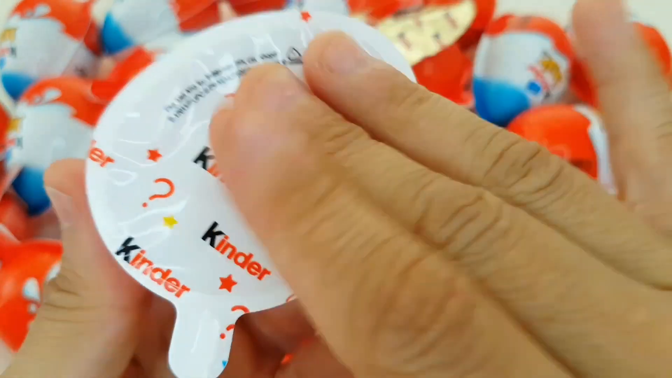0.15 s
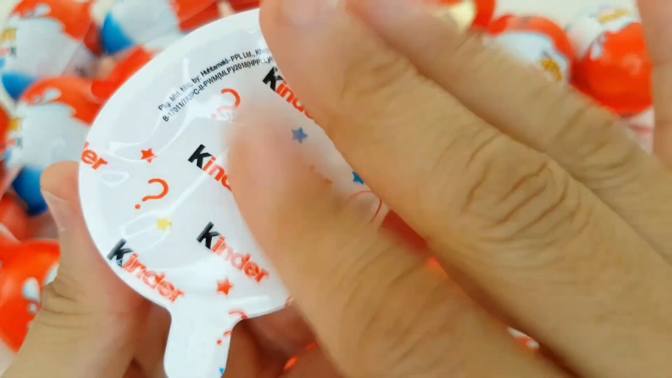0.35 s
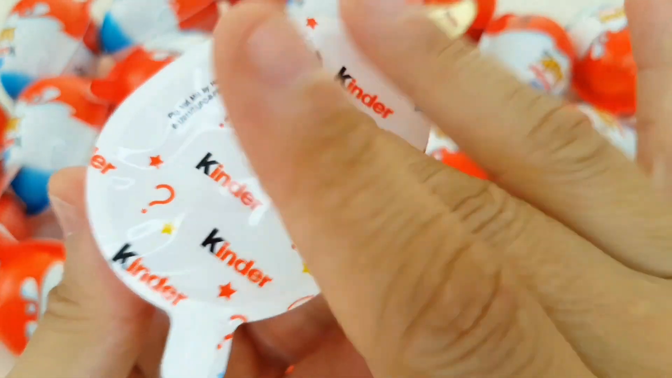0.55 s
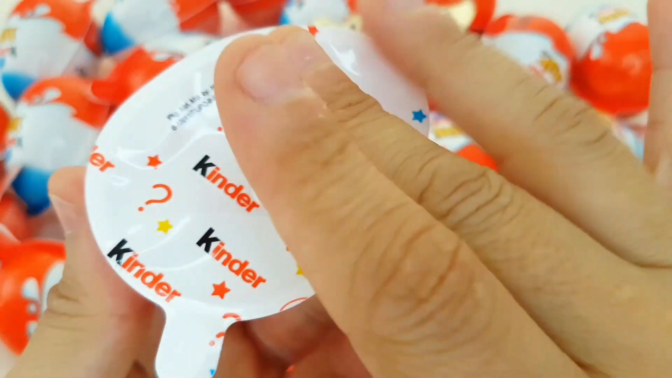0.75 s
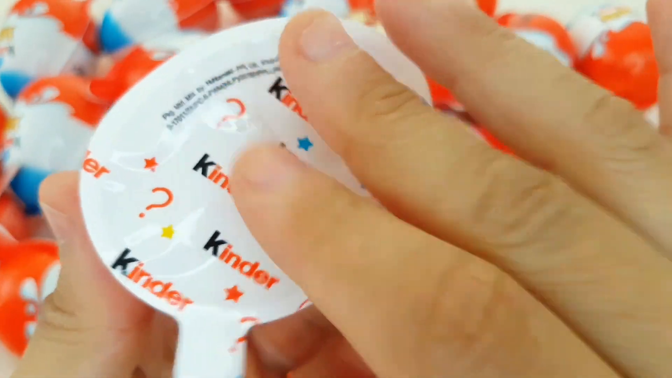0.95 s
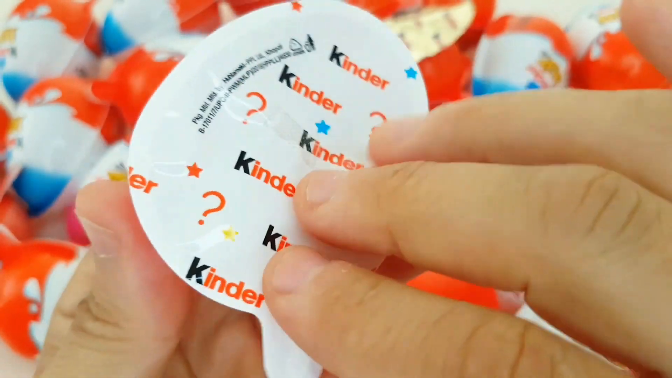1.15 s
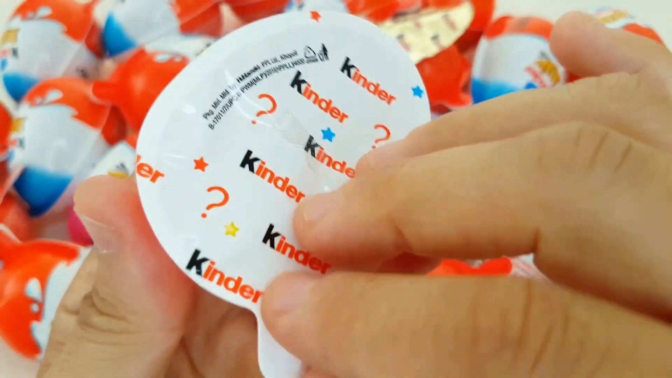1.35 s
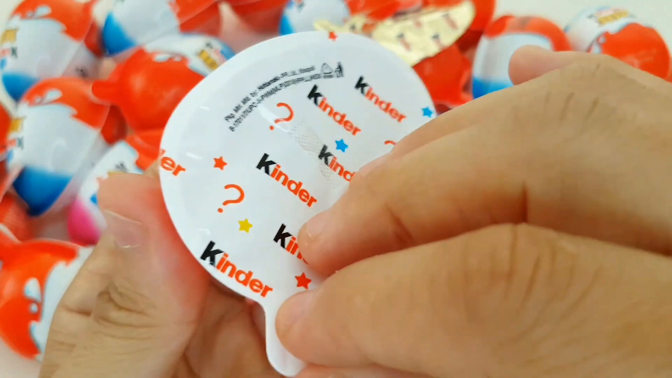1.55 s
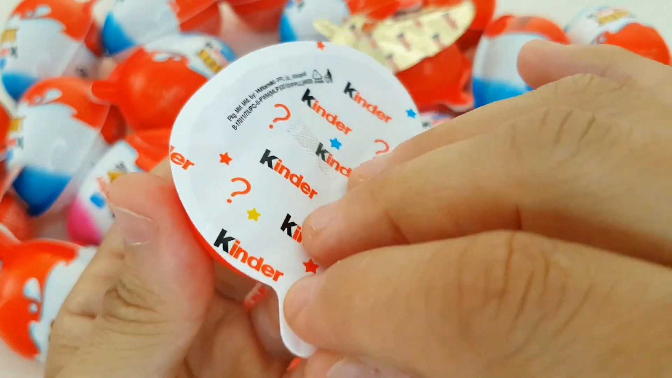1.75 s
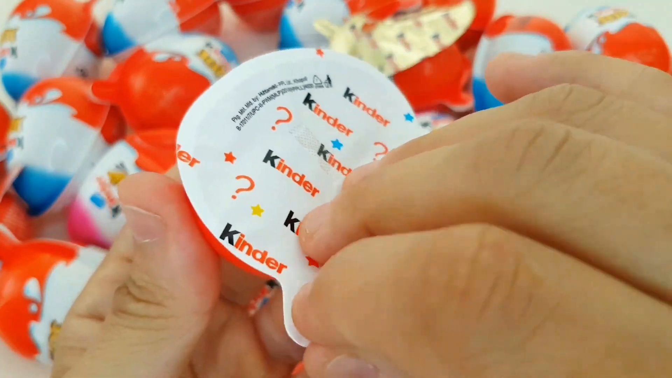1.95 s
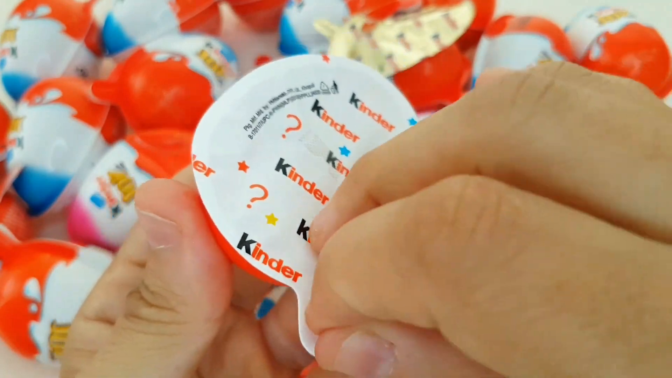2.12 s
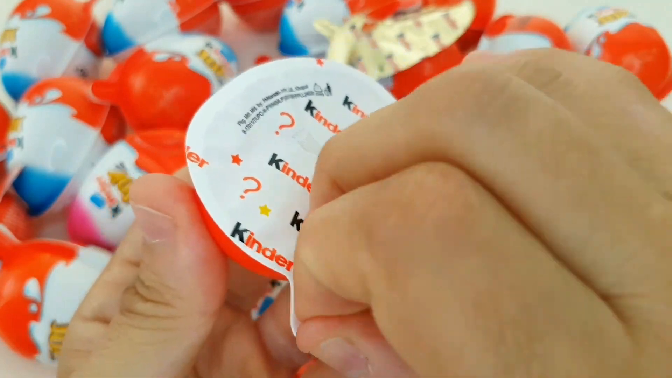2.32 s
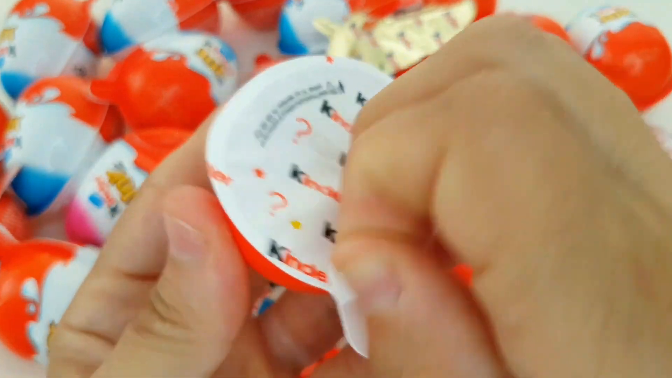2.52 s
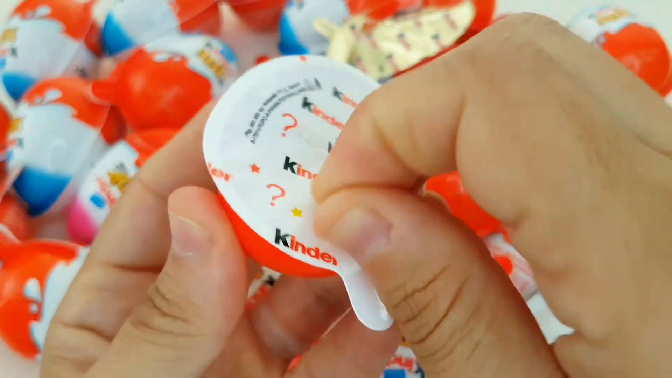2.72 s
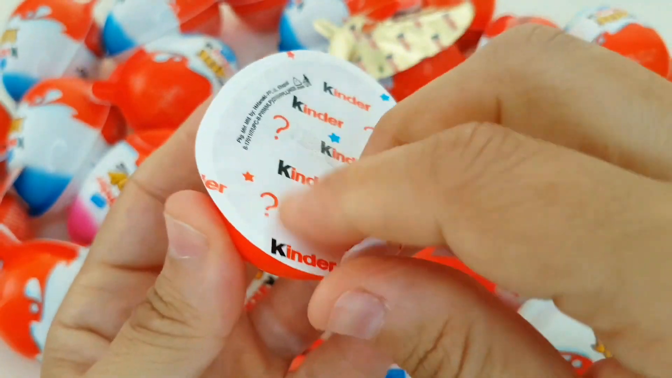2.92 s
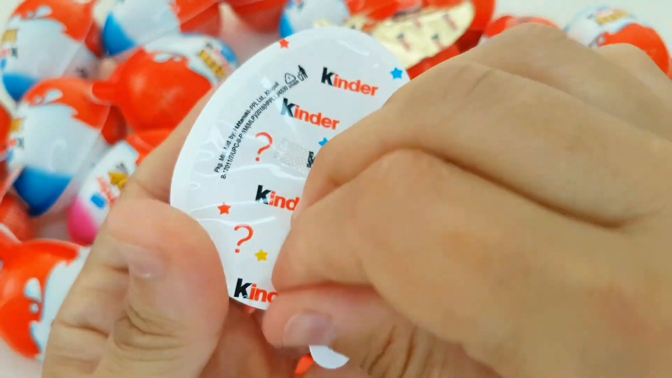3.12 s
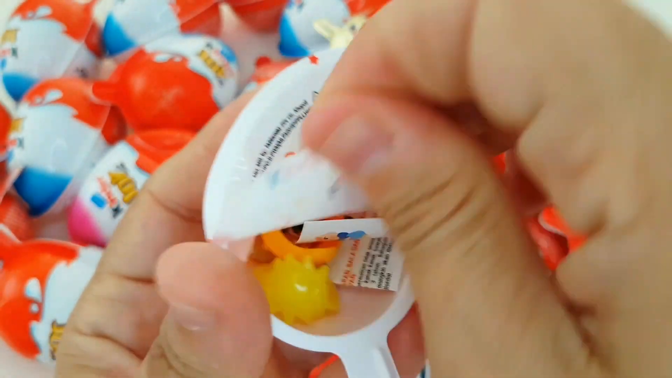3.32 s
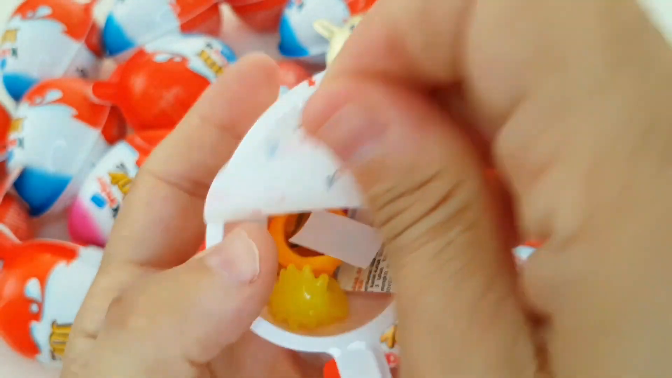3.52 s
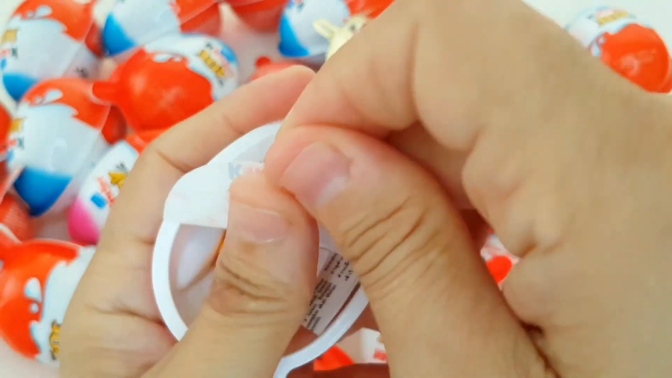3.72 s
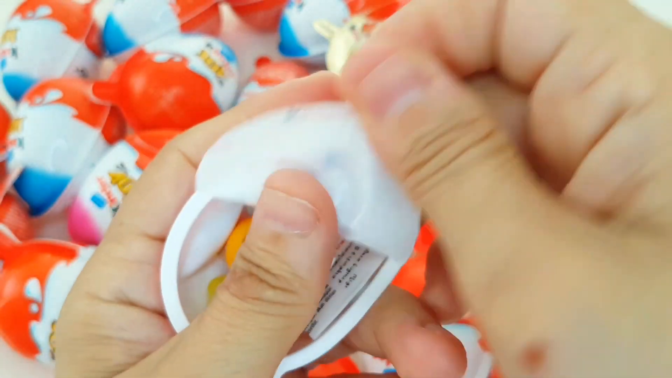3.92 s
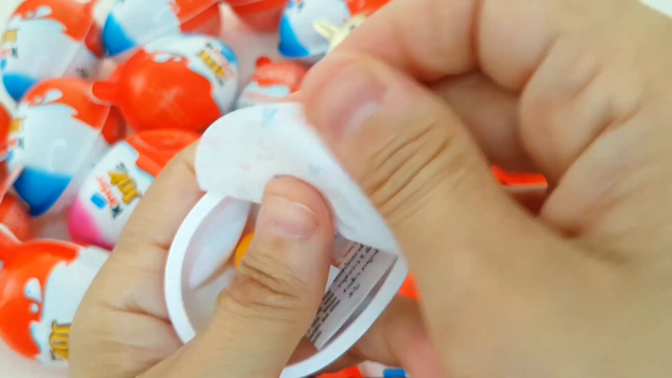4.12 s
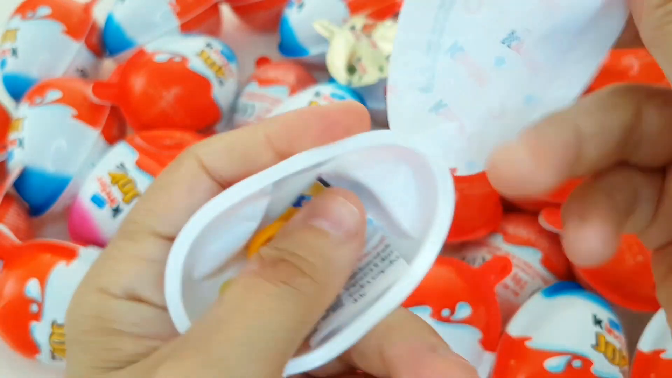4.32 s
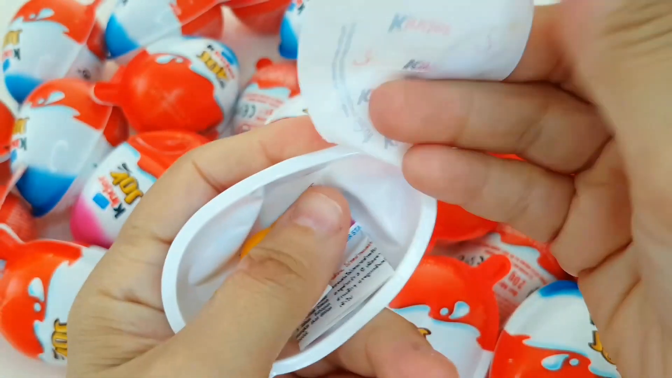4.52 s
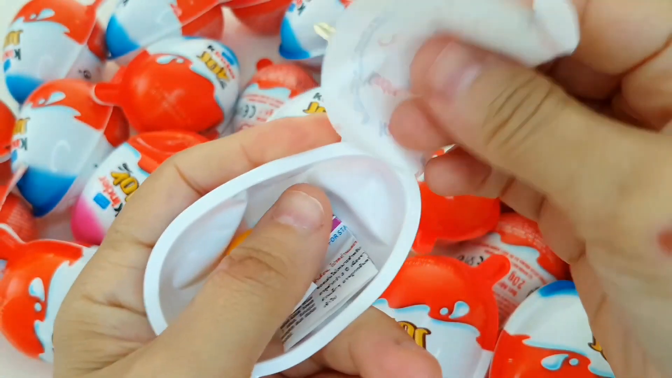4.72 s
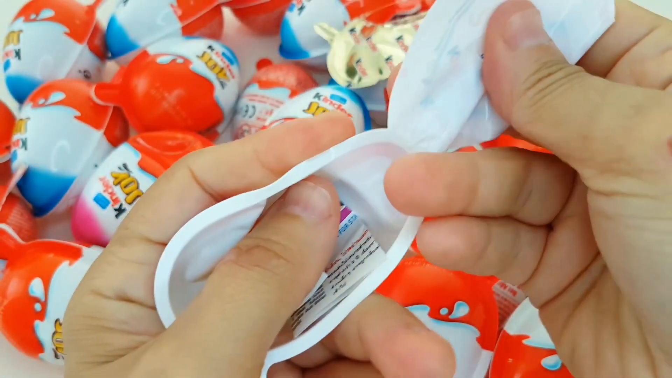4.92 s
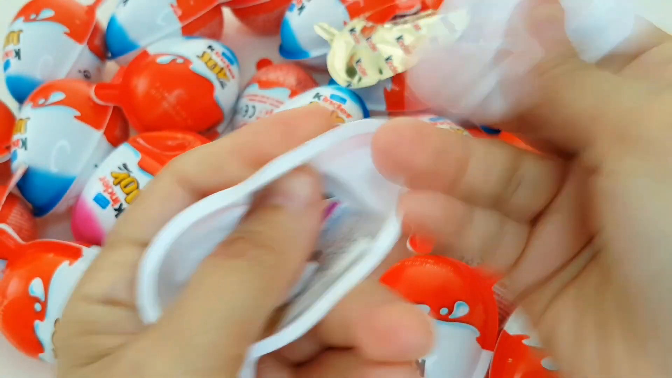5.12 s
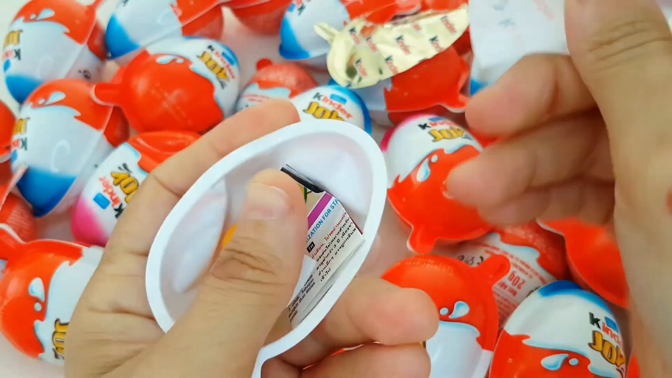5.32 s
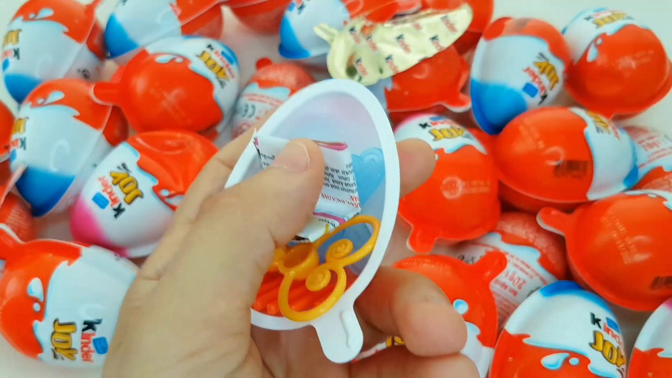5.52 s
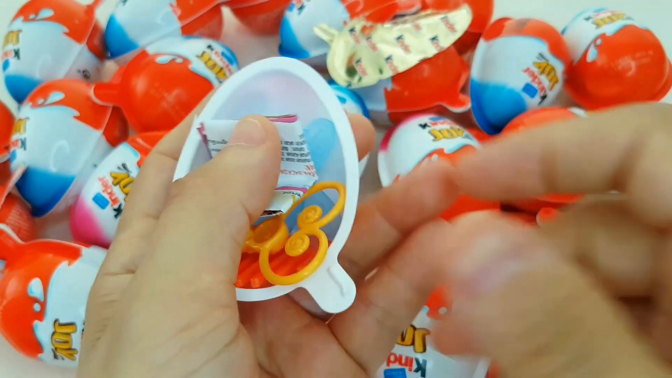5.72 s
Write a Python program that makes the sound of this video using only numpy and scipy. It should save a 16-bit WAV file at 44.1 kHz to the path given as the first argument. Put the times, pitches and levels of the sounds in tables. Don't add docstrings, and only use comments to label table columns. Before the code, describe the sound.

Very close stereo microphones in a small furnished room with a quiet floor. Fingertips tap a taut foil lid on a hollow plastic shell, with soft low booms and hollow ticks. After a near-silent stretch with a few small clicks, the tab is pinched, then two pulls tear the glue in bright crackling bursts. The loose seal crumples and snaps before the sound abruptly changes shot.

```python
import sys
import numpy as np
from scipy import signal
from scipy.fft import rfft, irfft
from scipy.io import wavfile
from scipy.ndimage import uniform_filter1d, map_coordinates

SR = 44100
rng = np.random.default_rng(int(sys.argv[2]) if len(sys.argv) > 2 else 0)


def ratio_of_db(decibels):
    return 10 ** (np.asarray(decibels, float) / 20)


def pcm_store(signal):
    levels = np.round(np.clip(np.atleast_2d(signal), -1, 1) * 32767)
    wavfile.write(sys.argv[1], SR, levels.astype(np.int16).T)


N = 258426

# frequency in Hz, level in dB per Hz.
FLOOR_COLOR = [(15, -26.5), (25, -10), (49, -16.5), (70, -8), (223, -4.5), (270, -10.5), (344, -4.5),
               (439, -14), (677, -12.5), (4500, -24.5), (8000, -31.5), (15300, -25), (15600, -67)]
# middle in seconds, half length in seconds, level in dB.
TRAFFIC_SWELLS = [(1.147, 0.17, -64), (1.6, 0.082, -63), (2.12, 0.13, -63), (3.302, 0.25, -61.5)]
# center in Hz, decay by 60 dB in seconds, level in dB.
ROOM_BANDS = [(150, 0.11, 0), (400, 0.4, 13.5), (866, 0.12, -3), (2000, 0.13, -1.5), (4167, 0.27, 5.5),
              (8920, 0.27, -9.5), (14600, 0.33, 13)]
SCENE_CHANGES = [.14, .395, 5.388]
# time in seconds, lag of the right microphone in ms.
HAND_PLACES = [(0, 0.17), (4.25, .15), (4.8, 0.059), (5.15, 0.027), (5.26, -0.1), (5.4, 0.012)]
# start in seconds, level in dB, pitch in Hz, skin knock over the level in dB.
FINGER_BLOWS = [(0.025, -44, 118, -15), (0.045, -37.5, 124, 0), (0.188, -45, 119, -10),
                (0.271, -36.5, 120, 0), (0.413, -34.5, 122, 2.5), (.54, -39, 115, -4.5),
                (0.655, -27, 123, -1), (0.747, -35.5, 112, -18), (2.541, -41, 140, 9), (2.59, -47, 168, 11),
                (3.047, -44, 135, -1), (3.215, -45.5, 127, 9.5), (3.235, -38.5, 127, 3),
                (3.442, -44.5, 142, -5), (3.621, -34, 115, -1.5), (3.855, -47, 174, -10),
                (4.005, -40.5, 134, 0), (4.037, -40, 133, -6), (4.211, -24, 135, -3),
                (4.245, -27, 130, 3.5), (4.421, -38, 141, -1.5), (4.482, -37.5, 125, 5.5),
                (4.51, -28, 127, 4.5), (4.696, -42.5, 140, -6.5), (4.742, -46.5, 150, -6.5),
                (4.768, -30, 179, -3.5), (4.813, -34, 174, 3), (4.897, -45, 170, -5.5),
                (5.139, -36.5, 131, 3), (5.19, -42, 120, -7), (5.21, -45, 141, -12), (5.257, -36.5, 172, 0),
                (5.312, -36, 111, -10), (5.37, -33.5, 114.8, -4.5)]
# center in Hz, width in Hz, level in dB.
SHELL_MODES = [(850, 2100, 2.5), (1400, 23, 13.5), (1750, 640, -11), (2150, 200, 10), (3030, 1100, -9)]
# center in Hz, width in Hz, level in dB.
FOIL_MODES = [(3780, 1680, 12.5), (6400, 3500, -16.5), (9900, 14000, 3), (15410, 4900, 5.5)]
# start in seconds, hold in seconds, level in dB, brightness in dB.
GLUE_PEELS = [(.02, 0.17, -59, -22), (.3, 0.072, -52, -6.5), (.66, 0.044, -51, -17), (3.04, 0.46, -54, -15),
              (3.235, 0.046, -34.5, -1), (3.345, 0.092, -34.5, -11.5), (3.59, 0.078, -51, -12),
              (3.7, 0.072, -57.5, -3.5), (3.98, 0.12, -48.5, -4.5), (4.19, 0.16, -56, -12.5),
              (2.578, 0.021, -55, 8), (2.82, 0.13, -64, -9), (5.146, .015, -51.5, 8),
              (4.685, 0.068, -43, -7)]
# start in seconds, hold in seconds, level in dB, brightness in dB.
GLUE_RIPS = [(3.24, 0.016, -36, 3), (3.217, 0.014, -35, -2), (4.21, 0.061, -17, -9),
             (4.513, 0.015, -26, -6.5), (4.764, 0.012, -25.5, -21), (4.806, 0.0031, -17.5, -13)]
# start in seconds, level in dB,
# pitch in Hz.
SHORT_PINGS = [(1.8262, -26, 5470), (1.8265, -18, 2800), (2.1375, -29, 4300), (3.2346, -17.5, 4350),
               (3.2525, -10.5, 6400), (3.261, -21, 6800), (3.3895, -27, 8100), (3.816, -16.5, 5140),
               (4.2105, -24.5, 6160), (4.8885, -15, 4640), (4.896, -13.5, 4900), (5.1465, -4, 5300),
               (4.0515, -16.5, 1800), (4.052, -24.5, 850), (4.32, -23.5, 4000), (4.3505, -31, 800),
               (4.359, -38, 1300), (3.24, -28, 330.6), (5.26, -32, 3900), (5.2605, -18, 6220),
               (5.309, -31, 3900),
               (0.052, -27.5, 468), (0.2361, -22.5, 1145), (0.2746, -16, 2026), (0.2746, -20, 1023),
                    (0.55, -36, 1280), (0.55, -16, 2050), (0.6095, -26, 1208), (0.6587, -10, 5230),
                    (0.667, -21.5, 2100), (0.6875, -30, 3620), (0.6875, -27.5, 1930), (0.7025, -23.5, 4170),
                    (0.7232, -35, 1310), (0.7232, -30.5, 1170), (0.9517, -36, 1020), (1.8261, -25.5, 930),
                    (2.5445, -15, 11550), (2.579, -9.5, 12550), (2.5935, -16, 4300), (2.9482, -28.5, 3315),
                    (2.9482, -21.5, 1080), (3.1146, -33, 1550), (3.2307, -18, 3670), (3.2307, -20, 1160),
                    (3.2358, -19.5, 8540), (3.2358, -16.5, 3550), (3.353, -32, 1870), (3.3659, -20.5, 3330),
                    (3.378, -28, 1570), (3.389, -13.5, 12100), (3.4228, -12.5, 2780), (3.4228, -12.5, 1420),
                    (3.442, -25, 9020), (3.442, -14.5, 5690), (3.8576, -15.5, 7570), (3.9754, -20, 13060),
                    (3.9775, -16.5, 850), (4.1828, -29.5, 3310), (4.191, -21.5, 3840), (4.223, -25.5, 1270),
                    (4.223, -22.5, 1490), (4.2428, -23.5, 3060), (4.2428, -9.5, 612), (4.2535, -23, 4160),
                    (4.2535, -13, 3460), (4.3998, -6.5, 3904), (4.5177, -21.5, 650), (4.5177, -14.5, 2110),
                    (4.5321, -36, 1080), (4.7377, -30, 1555), (4.801, -23, 1350), (4.8879, -29, 10750),
                    (4.8954, -29, 12010), (5.1443, -10.5, 2150), (5.3685, -18, 3450), (0.3065, -32, 1044),
                    (0.3624, -26.5, 1120), (3.3785, -24, 3680), (3.9758, -14.5, 2360), (1.825, -22, 1490)]
# time in seconds, pitch in Hz.
CUP_PITCH = [(.66, 970), (.752, 793), (1.0, 900), (1.83, 898), (2.5, 820), (4.3, 850), (4.8, 814),
             (5.15, 717)]
# start in seconds, cup ring in dB, then over it rim ring in dB, rim pitch in Hz,
# and treble crack over the cup ring in dB.
DRUM_BUCKLES = [(0.0338, -32.5, -0.5, 1260, -7), (0.052, -25.5, 7.5, 1720, -3.5),
                (.0582, -29.5, -4, 1600, -6), (0.0726, -30, -4, 1510, -31), (0.1886, -32.5, -13, 2014, -4),
                (0.1939, -27.5, 3, 1210, -28), (.2361, -33.5, 15, 1620, -9),
                (0.2746, -20.5, -1.5, 1590, -10), (0.306, -39, -3, 1525, -7), (.331, -30, -5, 1422, -26),
                (0.3402, -32, -6, 1685, -15), (0.3624, -39.5, 7.5, 1280, -26),
                (0.3744, -30, -24, 1490, -12.5), (0.4164, -13, -1.5, 1990, -11.5),
                (0.434, -48, -3, 1733, -28), (.545, -32.5, 11, 1480, -2), (0.5499, -25.5, -1, 1930, -19.5),
                (0.6095, -35, 14, 1970, -10.5), (0.628, -46.5, -2.5, 1980, -9),
                (0.6587, -13.5, 2.5, 1260, -1.5), (.6652, -43, 30.5, 2000, -22.5),
                (0.6875, -31, 7.5, 2080, -11.5), (0.702, -35, 10, 2850, -7), (0.7232, -31.5, 7.5, 1560, -8)]
REST_BUCKLES = [(.752, -12.5, -6.5, 1380, -15.5), (0.9392, -41, 10, 1680, -10),
                (0.9518, -38.5, 9, 1470, -5.5), (1.0534, -55, 0, 1630, -7.5), (1.091, -59.5, 10.5, 2460, 4),
                (1.154, -45.5, 0.5, 1500, -10.5), (1.2436, -47.5, 2.5, 2010, -4.5),
                (1.4358, -54, .5, 1265, -7), (1.531, -42, -23, 1340, -32), (1.611, -52.5, -2, 2710, -22),
                (1.8252, -22.5, 5, 2080, 4), (2.138, -34.5, 0.5, 3100, -2), (2.19, -51, 0, 1550, -26),
                (2.22, -42, -24, 1300, -29.5), (2.407, -44, -2.5, 1460, -35)]
PINCH_BUCKLES = [(2.5047, -54, -5, 1470, -6), (2.518, -27.5, 4, 2140, -6.5), (2.5441, -14.5, 1, 2220, -9),
                 (2.579, -37, 12.5, 2444, 12), (2.588, -22.5, 5.5, 1430, -5),
                 (2.5934, -32, 12.5, 1940, 12.5), (2.7385, -56, 7, 1416, -10), (2.763, -44, -2, 1840, -7),
                 (2.7744, -32, 1, 1414, -40), (2.782, -47, 1, 1470, -12), (2.9326, -45.5, 1, 1310, -7.5),
                 (2.938, -32, 14.5, 1400, -18), (2.9482, -29.5, 8.5, 2020, 4),
                 (3.052, -31.5, -7, 2120, -19), (3.0631, -31.5, -3.5, 1570, -27),
                 (3.072, -35, -5.5, 1407, -15.5), (3.0924, -56, -1, 2010, -0.5),
                 (3.115, -31, 3, 1483, -15.5), (3.1406, -39.5, 2, 1824, -24.5), (3.191, -63, 12, 1924, -10),
                 (3.203, -61.5, 22, 1390, -23)]
PULL_BUCKLES = [(3.2177, -32.5, 6, 2360, 2.5), (3.2304, -29.5, 16, 1380, -0.5),
                (3.2353, -22.5, 15.5, 1500, 14.5), (3.2533, -26, 15.5, 1870, 13),
                (3.354, -38.5, 12, 2050, 7.5), (3.366, -31, 15.5, 1310, 8), (3.38, -37.5, 10.5, 1610, 0),
                (3.389, -36.5, 3, 2255, 13), (3.4229, -22.5, 8, 1970, 1), (3.443, -34, -8, 1840, 10.5),
                (3.535, -31.5, -3, 1600, -12.5), (3.5714, -56, 7.5, 1330, -25), (3.5974, -53, 4, 1400, -18),
                (3.606, -59, 8, 1430, -17), (3.611, -40, -9, 1450, -28), (3.6251, -39.5, 15.5, 1500, 6.5),
                (3.644, -36.5, 3.5, 1710, -9), (3.794, -38, 2.5, 1690, -15), (3.8153, -26.5, 14, 1750, 0),
                (3.823, -58, 22.5, 1530, -15.5), (3.85, -39, 13.5, 1590, 1.5),
                (3.8577, -26.5, 9, 1650, 5.5), (3.87, -34.5, 9.5, 1860, -6.5)]
OPEN_BUCKLES = [(3.923, -36.5, 3.5, 2226, -9), (3.9587, -42, 9.5, 1750, 10),
                (3.9753, -18.5, 12.5, 2000, -3), (4.01, -15.5, -4, 2170, -7), (4.0495, -29, 10, 1792, 3.5),
                (4.0902, -29.5, -4.5, 2150, 0.5), (4.1652, -37, 5.5, 1870, -7.5),
                (4.1826, -31.5, 8.5, 1400, 7), (4.191, -45, 25.5, 2900, 8.5), (4.2106, -25.5, 2.5, 1895, 9),
                (4.222, -34.5, 14.5, 1514, 0.5), (4.2335, -38, 19, 1750, -7), (4.2427, -20.5, 8, 1680, -3),
                (4.2533, -11, -5, 1764, -0.5), (4.266, -6.5, -1, 2070, -14), (4.3004, -24, -23, 2096, -16),
                (4.32, -37, 8.5, 1900, 2.5), (4.3395, -38, -7, 1767, 5), (4.4001, -20.5, 3, 2040, -3.5),
                (4.4246, -35.5, 1.5, 1720, -14.5)]
CRUMPLE_BUCKLES = [(4.4768, -36.5, 1, 1887, -1), (4.4918, -20, 11.5, 1888, 6),
                   (4.5165, -24, 8.5, 1570, 8.5), (4.5264, -27.5, 5.5, 2590, -22),
                   (4.5326, -19.5, 3.5, 1452, -4), (4.6914, -33.5, -13.5, 1437, -23),
                   (4.7153, -31.5, -3, 2000, 1), (4.729, -41.5, 9.5, 2330, 9.5),
                   (4.7373, -36.5, 11, 2430, 8.5), (4.7661, -27.5, 4, 2980, 18),
                   (4.775, -30.5, 9, 1720, -20.5), (4.802, -18.5, -4.5, 1353, -23),
                   (4.8137, -11.5, 3, 1850, -2), (4.8877, -25, 14, 1840, 8.5),
                   (4.8953, -19.5, -6.5, 1706, 5.5), (4.9359, -35.5, 4.5, 2360, 2.5),
                   (5.144, -13, 4, 2310, -3.5), (5.2013, -30, -7, 2510, 2.5), (5.2592, -23, 7, 1900, 8),
                   (5.3084, -37, 10, 1270, 10.5), (5.3683, -37, 11.5, 1793, 2.5)]
BRIGHT_TICKS = [
    (0.6587, -24, 3.3, 2000, 2.9),
    (3.2372, -42, 8.1, 2874, 4.5),
    (3.4392, -31, 1.4, 1890, 2.1),
    (4.248, -21, 5.2, 2000, 2),
]
INNER_BUCKLES = [(.75, -29, 5, 1630, -2), (.778, -59.5, -15, 1198, -20), (3.26, -35, 26, 2694, 14.5),
                 (3.2465, -35, 19, 1910, -7), (3.279, -39.5, 18, 1488, -7), (3.2895, -40, 13, 2192, -4),
                 (3.2965, -48, 17, 2300, -5), (3.311, -46, 12, 1900, -6), (3.322, -49, 12, 1810, -7),
                 (3.9758, -24.5, 11, 2450, 10), (4.2135, -31, 11.5, 1500, -8.5),
                 (4.235, -24, 10, 1610, -3.5), (4.2455, -19, 9, 2220, 1), (4.2725, -28.5, 8.5, 1880, -14),
                 (4.709, -36, -3.5, 1660, -4), (4.7635, -29, 6, 1890, 8.5), (4.809, -20.5, 0.5, 1750, -1),
                 (4.832, -37.5, 1.5, 1800, -4), (4.863, -37, 3.5, 2090, 6.5), (5.1465, -27, -4.5, 2670, 10),
                 (5.157, -32, 9, 2000, -11), (5.198, -39, 11.5, 2130, -10.5), (5.222, -42, 5, 2280, 1),
                 (5.311, -58, 13, 1590, 4), (5.366, -32.5, 7.5, 1620, -6), (5.3715, -41.5, 9, 2890, 5.5)]

FOIL_TOP_HZ, TAIL_TOP_HZ = 17000, 15600


def ring(x, hz, width):
    return signal.lfilter(*signal.iirpeak(hz, hz / width, SR), x)


def body(x, modes):
    return sum((-1) ** k * ratio_of_db(db) * ring(x, hz, width) for k, (hz, width, db) in enumerate(modes))


def steep(x, lo_hz, hi_hz):
    return signal.sosfilt(signal.butter(3, [lo_hz, hi_hz], "band", fs=SR, output="sos"), x)


def top(x, top_hz):
    return signal.sosfilt(signal.ellip(10, .3, 75, top_hz, fs=SR, output="sos"), x)


def unit(x, count=None):
    axes = (-2, -1)[-x.ndim:]
    return x / np.sqrt(np.mean(x[..., :count] ** 2, axis=axes, keepdims=True) + 1e-30)


def pair(a, b, alike):
    alike = np.clip(alike, 0, 1)
    return np.array([a, alike * a + np.sqrt(1 - alike ** 2) * b])


def floor():
    hz = np.fft.rfftfreq(N, 1 / SR) + 1
    f, db = np.transpose(FLOOR_COLOR)
    a, b = rfft(rng.standard_normal((2, N)))
    color = ratio_of_db(np.interp(np.log(hz), np.log(f), db))
    return ratio_of_db(-61) * unit(irfft(pair(a, b, 90 / hz) * color, N))


def rumble():
    t = np.arange(N) / SR
    gain = ratio_of_db(-75)
    for s, half_s, db in TRAFFIC_SWELLS:
        gain = gain + ratio_of_db(db) * np.exp(-((t - s) / half_s) ** 2)
    low = steep(pair(*rng.standard_normal((2, N)), .6), 22, 49)
    return gain * unit(low)


def room():
    t, noise = np.arange(SR // 2) / SR, rng.standard_normal((2, SR // 2))
    late = 0
    for hz, t60, db in ROOM_BANDS:
        late = late + ratio_of_db(db - 60 * t / t60) * ring(pair(*noise, 380 / hz), hz, 1.42 * hz)
    table_hz, table_width_hz, table_t60_s, table_db = 880, 130, 0.2, 5.5
    table = ring(pair(*noise, 0.56), table_hz, table_width_hz)
    late = late + ratio_of_db(table_db - 60 * t / table_t60_s) * table
    late = late * np.clip((t - .004) / 0.0024, 0, 1)
    early_t60_s = 0.013
    early = pair(*rng.standard_normal((2, SR // 2)), 0.91) * ratio_of_db(-60 * t / early_t60_s) * (t > .0025)
    return (ratio_of_db(-13.5) * unit(late) + ratio_of_db(-13.5) * unit(early)) / np.sqrt(len(t))


def booms():
    length, lead, boom_q = 4096, 60, 3.1
    out = np.zeros(N + length)
    push = 1. * (np.arange(length) == lead)
    knock = ratio_of_db(42.5) * steep(ring(push, 280, 160), 190, 480)
    soft_push = uniform_filter1d(push, size=120)
    for s, db, hz, knock_db in FINGER_BLOWS:
        ringing = ratio_of_db(50.5) * steep(ring(soft_push, hz, hz / boom_q), 65, 320)
        start = int(s * SR) - lead
        out[start:start + length] += ratio_of_db(db) * (ringing + ratio_of_db(knock_db) * knock)
    return out[:N]


def crackle(runs, per_s, spread_db, low_hz, low_db, fall_db_per_s):
    t, gain, bright = np.arange(N) / SR, np.zeros(N), np.zeros(N)
    rise_db_per_s = 3003
    for s, hold_s, db, bright_db in runs:
        rise_db = rise_db_per_s * np.maximum(s - t, 0)
        fall_db = fall_db_per_s * np.maximum(t - s - hold_s, 0)
        run = ratio_of_db(db - rise_db - fall_db)
        gain = gain + run
        bright = bright + run * ratio_of_db(bright_db)
    luck = rng.random((2, N))
    size = ratio_of_db(spread_db * np.minimum(rng.exponential(size=(2, N)), 3))
    ticks = (luck < per_s / SR) * size * rng.choice([-1, 1], size=(2, N))
    rub = unit(steep(body(pair(*ticks, 0.93), SHELL_MODES), 0.68 * low_hz, 4300))
    low = ring(ring(ticks[0], low_hz, 0.25 * low_hz), low_hz, 0.7 * low_hz)
    rub = rub + ratio_of_db(low_db) * unit(low)
    even_ticks = np.sign(ticks) * np.sqrt(np.abs(ticks))
    slide = unit(even_ticks) + ratio_of_db(5) * unit(luck - .5)
    fizz = unit(steep(body(pair(*slide, 0.38), FOIL_MODES), 4900, FOIL_TOP_HZ))
    return gain * rub + bright * fizz


def glue():
    peel = crackle(GLUE_PEELS, per_s=700, spread_db=5.5, low_hz=330, low_db=-18.0, fall_db_per_s=405.5)
    rip = crackle(GLUE_RIPS, per_s=1500, spread_db=4.5, low_hz=540, low_db=-13.0, fall_db_per_s=696)
    return peel + ratio_of_db(-7.0) * rip


def pings():
    length, rows = 1536, SHORT_PINGS
    out, t = np.zeros((2, N + length)), np.arange(length) / SR
    for (s, db, hz), turn in zip(rows, rng.random((len(rows), 2))):
        apart = (1 - 0.46) * min(hz / 2500, 1) ** 2 * (turn[1] - .5)
        phase = 2 * np.pi * (hz * t + turn[0] + apart * np.array([[-1], [1]]))
        t60 = 0.0099 * (4000 / hz) ** 0.72
        start = int(s * SR)
        out[:, start:start + length] += ratio_of_db(db - 60 * t / t60) * np.minimum(t / 0.00034, 1) * np.sin(phase)
    return out[:, :N]


def snaps(table):
    s, db, rim_db, rim_hz, crack_db = np.transpose(table)
    lead, length = 120, 1536
    out = np.zeros((3, N + length))
    after = (np.arange(length) - lead) / SR
    chance = rng.random((len(s), 2, length))
    noise = rng.standard_normal((len(s), 2, 2, length))
    soft = np.clip((-15 - db - np.maximum(rim_db, 0)) / 20, 0, 1)[:, None]
    scatter = np.exp(-after / (.0012 + .002 * soft[..., None]))
    creak = ratio_of_db(-13) * np.exp(after / .002)
    ticks = noise[:, 0] * (chance < .06) * np.where(after > 0, scatter, creak)
    ticks[..., lead] = 2.3 - soft
    spray = ticks + ratio_of_db(0.5) * noise[:, 1] * np.exp(-after / 0.0013) * (after > 0)
    lone = np.tile(1. * (after == 0), (len(s), 1, 1))

    def two_sides(x, alike):
        return pair(x[:, 0], x[:, 1], alike).swapaxes(0, 1)

    near = (two_sides(0.48 * ticks + lone, .98), two_sides(ticks, .3), two_sides(spray, .4))
    cup_hz = np.interp(s, *np.transpose(CUP_PITCH)) * (1 + .045 * noise[:, 1, 0, 0])
    cup_q = 5.5
    air = ratio_of_db(np.clip(-4.5 + 0.6 * (crack_db - np.maximum(rim_db, 0)), -24, 4))[:, None, None]
    rows = []
    for low, mid, high, shade in [(*near, ratio_of_db([[4.5], [-4.5]])), (lone, lone, lone, 1)]:
        cup = np.array([ring(x, hz, hz / cup_q) for x, hz in zip(low, cup_hz)])
        cup = ring(cup + ratio_of_db(-16.0) * ring(low, 540, 200), 500, 690)
        rim = np.array([ring(x, hz, 0.33 * hz) for x, hz in zip(mid, rim_hz)])
        rim = steep(rim + ratio_of_db(-27.5) * mid, 1150, 2960)
        crack = body(high, FOIL_MODES[:1]) + shade * body(high, FOIL_MODES[1:2])
        crack = steep(crack + shade * air * body(high, FOIL_MODES[2:]), 3400, FOIL_TOP_HZ)
        crack = np.where(soft[..., None] > .25, top(crack, TAIL_TOP_HZ), crack)
        thud = steep(ring(low, 330, 180), 260, 470)
        parts = [(0 * db, cup), (rim_db, rim), (crack_db, crack), (-24 - 8 * soft[:, 0], thud)]
        rows.append(sum(ratio_of_db(db + part_db - 8.0)[:, None, None] * unit(part, count=380)
                        for part_db, part in parts))
    for i, snap in zip((s * SR).astype(int) - lead, np.concatenate(rows, axis=1)):
        out[:, i:i + length] += snap
    return out[:, :N]


def scene():
    t = np.arange(N) / SR
    lag_ms = np.interp(t, *np.transpose(HAND_PLACES))
    gestures = DRUM_BUCKLES + REST_BUCKLES + PINCH_BUCKLES + PULL_BUCKLES + OPEN_BUCKLES + CRUMPLE_BUCKLES
    buckles = snaps(gestures + BRIGHT_TICKS)
    hands = top(glue() + booms(), TAIL_TOP_HZ)
    out, reply = floor() + rumble(), room()
    left, right, around = buckles + snaps(INNER_BUCKLES)
    tones = steep(pings(), 230, FOIL_TOP_HZ)
    low_pings = ratio_of_db(-1.5) * steep(tones[0], 210, 3000)
    around = top(around + hands[0] + low_pings, TAIL_TOP_HZ)
    pan_db = -0.34 + 38.5 * lag_ms
    left, right = (hands + tones + [left, right]) * ratio_of_db(pan_db * np.array([[.5], [-.5]]))
    late_right = map_coordinates(right, [(t - lag_ms / 1e3) * SR], order=3)
    near = np.array([left, late_right])
    edges = [0] + [int(c * SR) for c in SCENE_CHANGES] + [N]
    for a, b in zip(edges, edges[1:]):
        wet = signal.fftconvolve(around[None, a:b], reply, axes=1)[:, :b - a]
        fade = np.clip((b / SR - t[a:b]) / 0.0011, 0, 1)
        out[:, a:b] += (near[:, a:b] + wet) * fade
    return out


def top_cut(x):
    return signal.sosfilt(signal.butter(12, 16850, fs=SR, output="sos"), x)


def record(dry):
    rounded = np.tanh(dry)
    finished = top(rounded, 16500) - .0009
    return top_cut(finished)


dry = scene()
out = record(dry)
pcm_store(out)
```